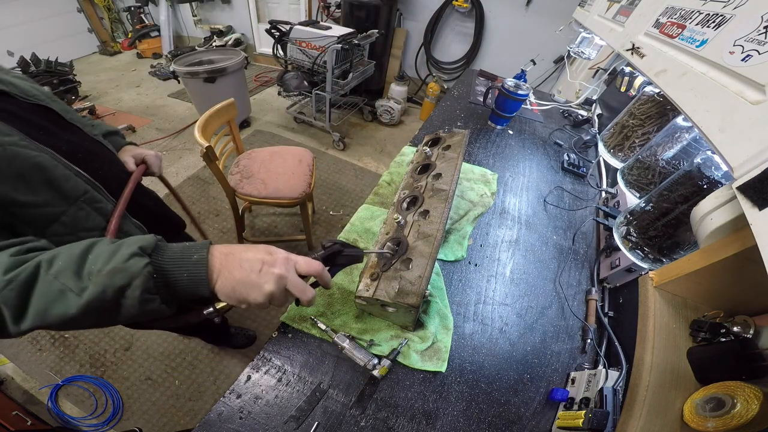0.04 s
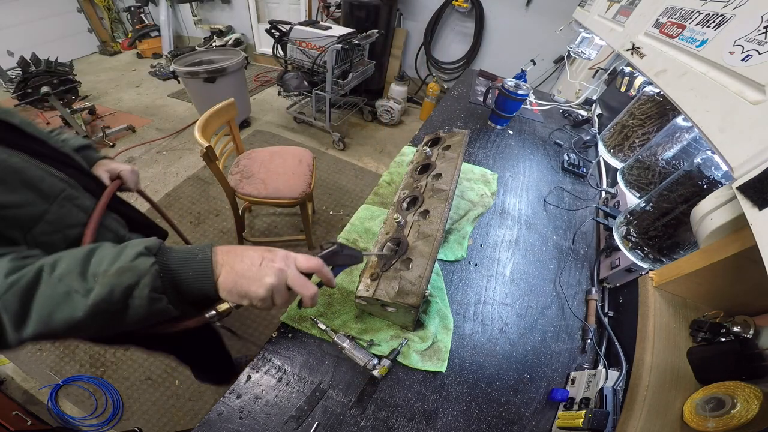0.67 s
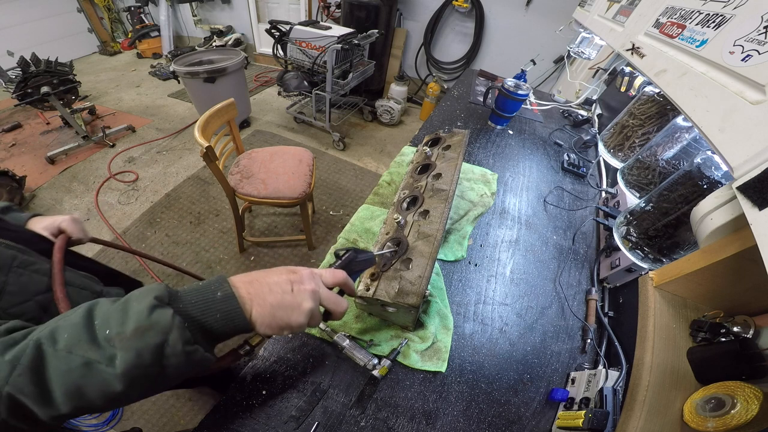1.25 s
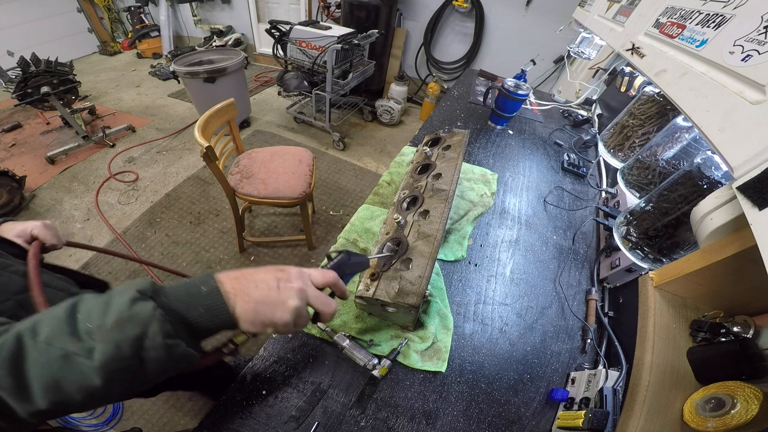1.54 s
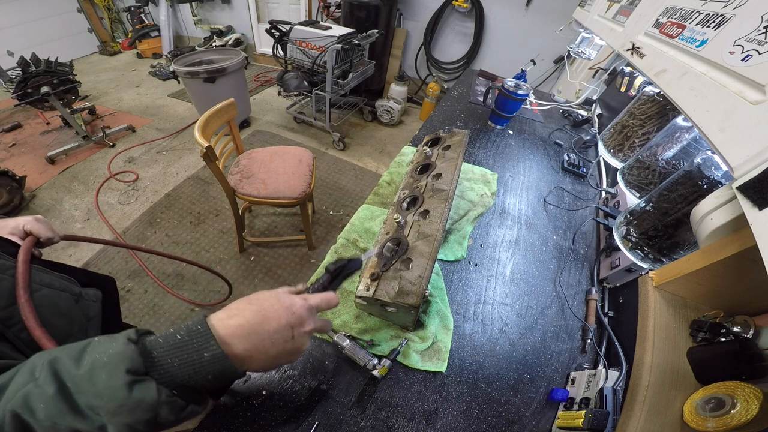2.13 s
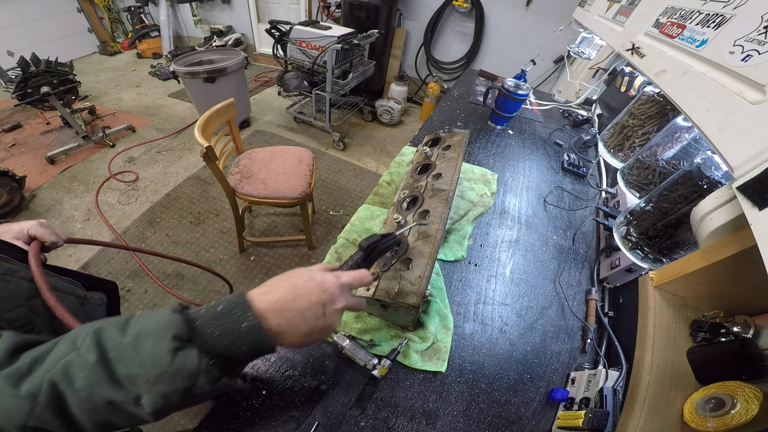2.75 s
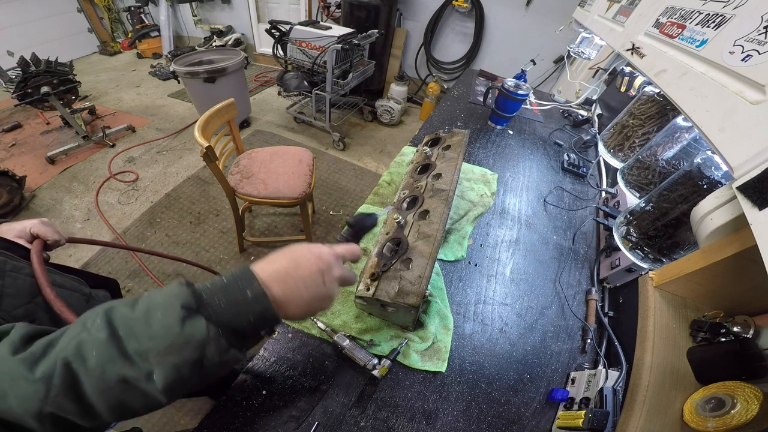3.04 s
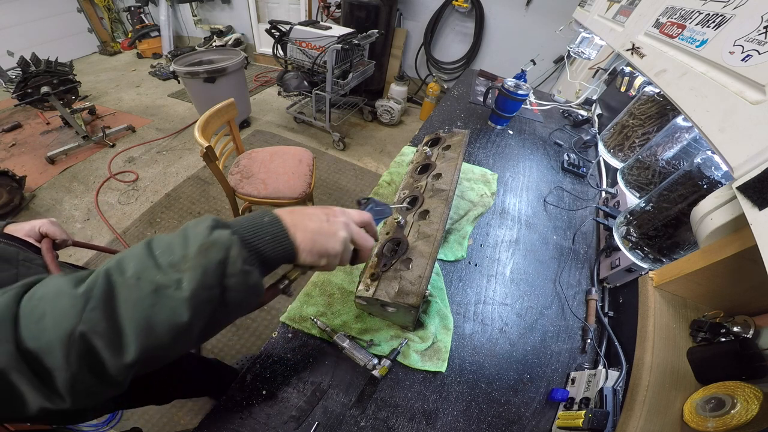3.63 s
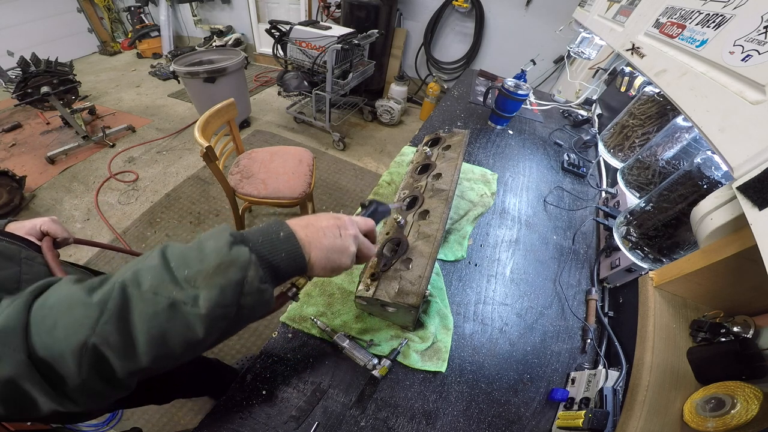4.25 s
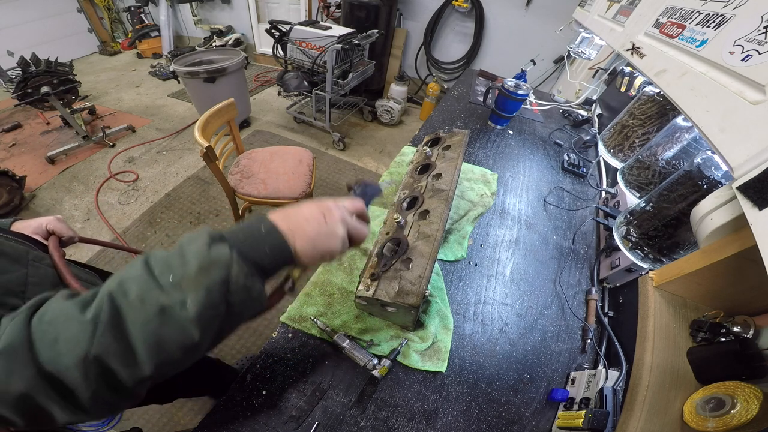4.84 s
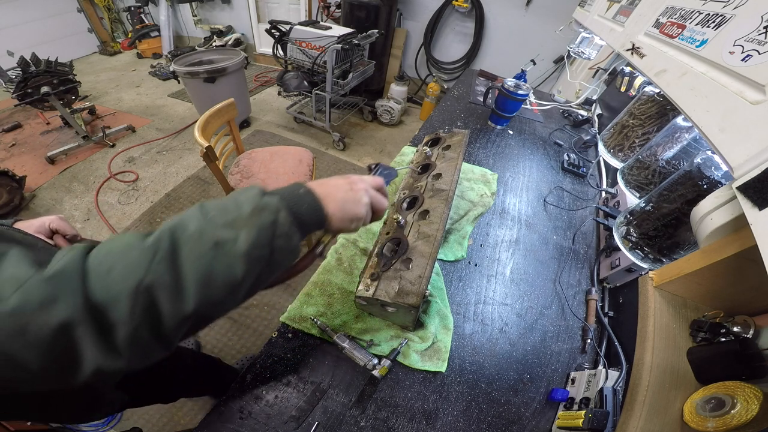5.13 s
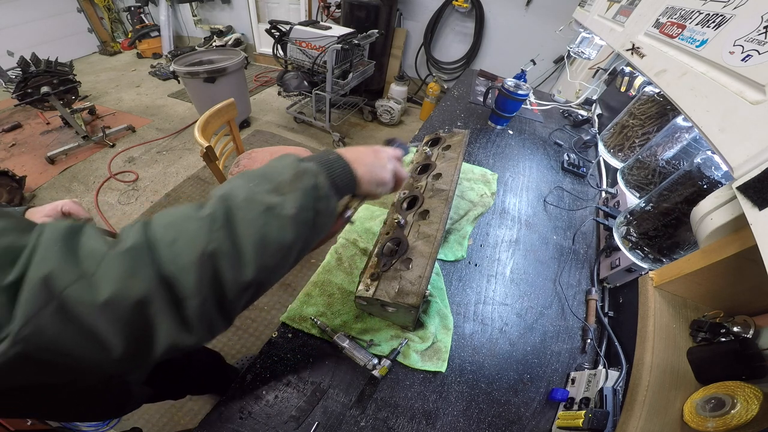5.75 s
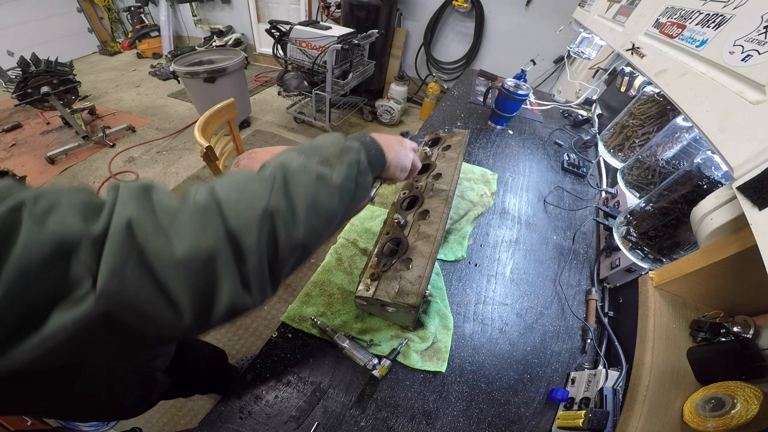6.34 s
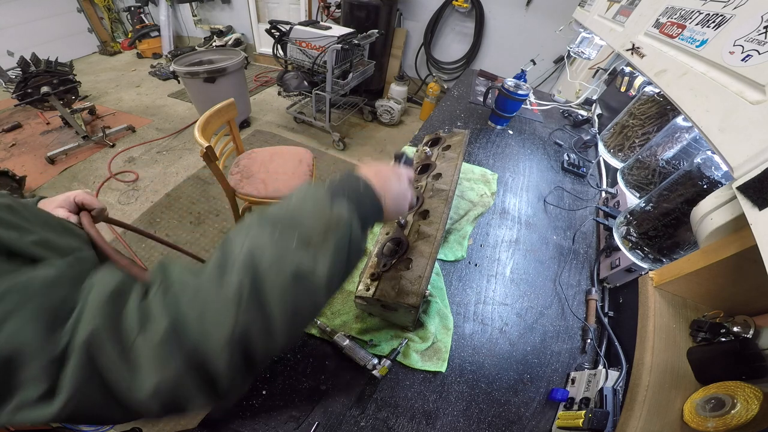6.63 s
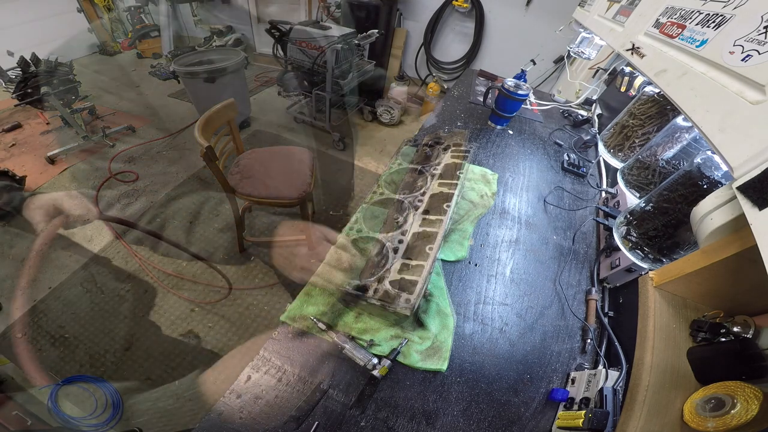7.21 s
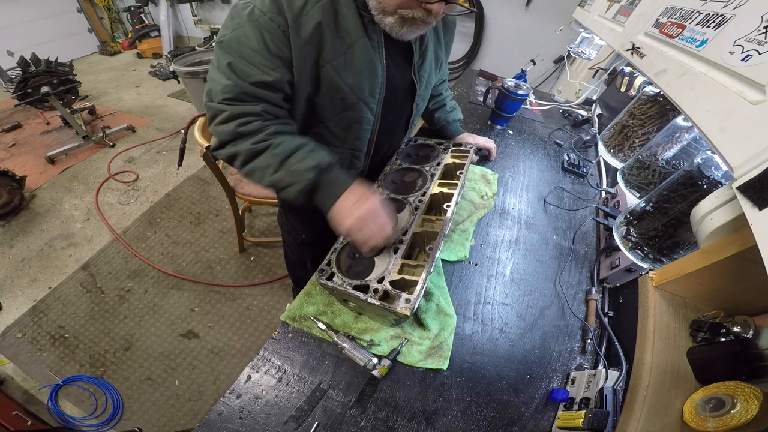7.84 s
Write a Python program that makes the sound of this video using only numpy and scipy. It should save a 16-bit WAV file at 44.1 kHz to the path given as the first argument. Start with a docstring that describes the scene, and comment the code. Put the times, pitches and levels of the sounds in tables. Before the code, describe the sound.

An air gun hisses and whistles over metal while a compressor chugs, then the sound turns into a high buzzing whine.

```python
"""Air gun and piston compressor

An air gun blows out a cylinder head on a workshop bench while a compressor chugs, its knocks repeating
each turn. The turbulent jet hisses, drives ports, holes and gaps into resonance and chirps across edges.
The whole sound dips six times, then crossfades to the compressor sped up into a high buzzing whine."""
import sys
import numpy as np
from scipy import signal
from scipy.fft import rfft, irfft, next_fast_len
from scipy.io import wavfile

SR = 44100
rng = np.random.default_rng(int(sys.argv[2]) if len(sys.argv) > 2 else 0)


def digitize_waveform(pressure):
    """Quantize a signal to 16-bit integers and store it at the path in sys.argv[1].

    Rows of a 2-D input are taken as channels; values are limited to [-1, 1].
    """
    field = np.atleast_2d(pressure).T
    bounded = np.clip(field, -1, 1)
    quanta = np.round(bounded * 32767).astype(np.int16)
    wavfile.write(sys.argv[1], SR, quanta)


N = 347493
TIME = np.arange(N) / SR
TURNS_PER_S, SPEED_UP = 18.36, 6.861


def from_db(db):
    """Amplitude ratio of a level in decibels."""
    return 10 ** (np.asarray(db) / 20)


def unit_rms(x):
    """Normalisation to an rms of 1."""
    return x / np.sqrt(np.mean(x ** 2) + 1e-20)


def in_time(curve):
    """Linear interpolation of (time, value) rows at every sample."""
    return np.interp(TIME, *np.transpose(curve))


def at_hz(spectrum, hz):
    """Interpolation of (frequency, level) rows on a logarithmic frequency axis."""
    row_hz, row_db = np.transpose(spectrum)
    return np.interp(np.log(hz + 1e-9), np.log(row_hz), row_db)


def bell(centre_s, length_s):
    """Gaussian pulse of height 1."""
    return np.exp(-np.minimum((2 * (TIME - centre_s) / length_s) ** 2, 50))


def drift(rate_hz):
    """Slow random fluctuation: low-pass noise of rms 1."""
    step, run_in = 40, 2000
    pole = np.exp(-2 * np.pi * rate_hz * step / SR)
    white = rng.standard_normal(N // step + run_in + 2)
    slow = signal.lfilter([1], [1, -2 * pole, pole ** 2], white)[run_in:]
    return np.interp(np.arange(N) / step, np.arange(len(slow)), unit_rms(slow))


def noise(spectrum):
    """Spectral shaping of white noise to a given density in dB per Hz."""
    size = next_fast_len(N)
    gain = from_db(at_hz(spectrum, np.fft.rfftfreq(size, 1 / SR))) * np.sqrt(SR / 2)
    return irfft(rfft(rng.standard_normal(size)) * gain, size)[:N]


def resonance(hz, width_hz, size=N):
    """A cavity driven by turbulence gives narrow-band noise about its natural frequency; rms 1."""
    core = signal.butter(1, width_hz / 2, fs=SR, output="sos")
    skirt = signal.butter(1, width_hz * 1.5, fs=SR, output="sos")
    in_phase, quadrature = signal.sosfilt(np.vstack([core, skirt]), rng.standard_normal((2, size)))
    phase = 2 * np.pi * np.cumsum(hz * np.ones(size)) / SR
    return unit_rms(in_phase * np.cos(phase) + quadrature * np.sin(phase))


# Strokes and valve slaps: (position in the cycle [turns], centre frequency [Hz], weight [dB])
PUMP_KNOCKS = [(.10, 200, 0), (.48, 230, 2), (.79, 600, 0), (.45, 1000, -3), (.69, 1000, 0),
               (.05, 1500, -3)]
def pump(strong, weak, speed, wobble_turns, count=95, size=8192):
    """Periodic knocks form a harmonic series on the rotation rate; the belt drive wobbles a little."""
    orders = np.arange(1, count + 1)
    normal_hz = orders * TURNS_PER_S
    # Standing waves in the room favour some harmonics.
    level_db = at_hz(weak, normal_hz * speed) + 2.8 * rng.standard_normal(count)
    for order, db in strong:
        level_db[order - 1] = db
    # The knocks set the phases, and reflections scatter them.
    phasors = rng.standard_normal(count) + 1j * rng.standard_normal(count)
    for position, hz, db in PUMP_KNOCKS:
        band = from_db(db) * np.exp(-2 * np.log(normal_hz / hz) ** 2)
        phasors += band * np.exp(-2j * np.pi * orders * position)
    harmonics = from_db(level_db) * phasors / abs(phasors)
    one_turn = irfft(np.r_[0, harmonics], size) * size / np.sqrt(2)
    turns = TURNS_PER_S * speed * TIME + wobble_turns * drift(2.04)
    return np.interp(turns % 1, np.arange(size) / size, one_turn)


# Motor partials at normal speed: (frequency [Hz], level [dB])
MOTOR_PARTIALS = [(59.4, -35.5), (118.8, -49.5), (238.4, -38)]
def motor(speed):
    """Superposed sinusoids: the electric motor hums at its own rate, unrelated to the pump's."""
    return sum(np.sqrt(2) * from_db(db) * np.sin(2 * np.pi * (hz * speed * TIME + rng.random()))
               for hz, db in MOTOR_PARTIALS)


# Strong pump harmonics: (harmonic number, level [dB])
PUMP_HARMONICS = [(2, -36), (6, -43), (7, -39.5), (9, -37.5), (10, -41.5), (12, -32), (15, -40),
                  (16, -35.5), (18, -38.5), (19, -49), (20, -38), (22, -42), (28, -45.5), (30, -39),
                  (31, -36), (34, -39.5), (38, -40), (39, -38.5), (49, -39), (50, -40), (51, -56),
                  (53, -36), (54, -43.5), (56, -59), (57, -41.5), (58, -39.5), (59, -42), (63, -42.5),
                  (70, -38.5), (72, -40)]
# Envelope of the weaker harmonics: (frequency [Hz], level [dB])
PUMP_ENVELOPE = [(18, -64), (55, -51.5), (150, -49.5), (450, -48), (800, -53), (1000, -72.5), (1300, -58.5),
                 (1500, -53), (1750, -64.5)]
# Intake and fan noise: (frequency [Hz], spectral density [dB per Hz])
INTAKE_SPECTRUM = [(15, -75), (40, -65), (90, -61.5), (170, -65), (320, -68.5), (420, -56), (500, -65),
                   (600, -61.5), (760, -64), (950, -59), (1250, -60.5), (1600, -71.5), (3000, -86)]
def compressor(gulp_depth=0.23):
    """Pump and motor sound over intake noise, amplitude-modulated by one gulp of air per turn."""
    chug = pump(PUMP_HARMONICS, PUMP_ENVELOPE, speed=1, wobble_turns=0.0018)
    gulps = 1 + gulp_depth * np.cos(2 * np.pi * (TURNS_PER_S * TIME - 2 / 3))
    return chug + motor(speed=1) + gulps * noise(INTAKE_SPECTRUM)


# Jet noise: (frequency [Hz], relative spectral density [dB])
HISS_SPECTRUM = [(500, -13), (1500, -9), (2200, -3), (3750, -2.5), (5000, -0.5), (6800, 0.5), (7500, 0),
                 (9300, 2.5), (11000, 1), (12700, 2), (14300, -0.5), (16000, 1)]
def jet_hiss(level_db, patchy_db=1.7, bands=22):
    """Turbulent noise brightens as it grows; its bands swell independently as the nozzle moves."""
    tilt_db_per_octave = -2.5 + 0.42 * (level_db + 23)
    size = next_fast_len(N)
    spectrum = rfft(unit_rms(noise(HISS_SPECTRUM)), size)
    hz = np.fft.rfftfreq(size, 1 / SR)
    edges_hz = np.linspace(0, 16000, bands + 1)
    hiss = np.zeros(N)
    for low, high in zip(edges_hz, edges_hz[1:]):
        band = irfft(spectrum * ((hz >= low) & (hz < high)), size)[:N]
        octaves = np.log2(max(high, 4000) / 10000)
        hiss += band * from_db(tilt_db_per_octave * octaves + patchy_db * drift(5.3))
    return from_db(level_db) * hiss


# Modes of the narrow gaps: (frequency [Hz], bandwidth [Hz], relative level [dB])
GAP_MODES = [(4483, 75, -3), (4826, 280, -4.5), (5470, 330, -4.5), (5740, 150, -7), (6660, 170, -7.5),
             (6890, 270, -8)]
# How squarely the jet meets the gaps: (time [s], relative level [dB])
GAP_COUPLING = [(0, 2), (.39, 1.5), (.45, -4), (2.17, -6), (2.88, -13.5), (3.24, -11), (3.65, -0.5),
                (3.84, -5), (5.04, -10.4), (5.37, -2.5), (5.74, -10.5), (6.85, -17), (7.31, -12)]
def gap_ringing(jet_db, usual_hz=5250, reach_hz=550, trim_db=-1.35):
    """Selective excitation: all gaps resonate, with a boost near the frequency the jet favours."""
    # Around each whistle, the favoured frequency is pulled towards its pitch.
    pulls = [(1.3 * bell(s - .02, 0.31), hz) for s, _, hz, _, _ in GAP_WHISTLES]
    favoured_hz = (usual_hz + sum(pull * hz for pull, hz in pulls)) / (1 + sum(p for p, _ in pulls))
    gains = [from_db(db) * (1 + 1 / (1 + ((hz - favoured_hz) / reach_hz) ** 2))
             for hz, _, db in GAP_MODES]
    ringing = sum(gain * resonance(hz, width) for gain, (hz, width, _) in zip(gains, GAP_MODES))
    return from_db(jet_db + in_time(GAP_COUPLING) + trim_db) * ringing / np.linalg.norm(gains, axis=0)


# Howl of a bolt hole: (time [s], level [dB])
HOLE_LEVEL = [(0, -38), (.39, -32), (1.06, -35.5), (2.06, -30), (2.6, -37), (3.05, -26), (3.23, -42),
              (3.6, -28), (3.73, -40), (4.05, -32.5), (4.78, -29), (5.0, -29), (5.3, -27), (5.81, -34.5),
              (6.07, -27.5), (6.6, -38), (7.3, -34)]
# Its resonance: (time [s], frequency [Hz])
HOLE_FREQUENCY = [(0, 2870), (4.5, 2800), (5.3, 2720), (6.3, 2770)]
def bolt_hole(swell_db, swell_share=0.48):
    """Cavity resonance of a bolt hole, sinking slightly as the nozzle moves along the casting."""
    level_db = in_time(HOLE_LEVEL) + swell_share * swell_db
    return from_db(level_db) * resonance(in_time(HOLE_FREQUENCY), width_hz=287)


# Howl of the big port: (time [s], level [dB])
PORT_LEVEL = [(0, -47), (.52, -26), (.85, -36), (1.1, -28.5), (2.15, -27.5), (2.3, -35.5), (4.6, -31),
              (5.22, -25), (5.7, -34), (7.3, -34.5)]
def big_port():
    """Cavity resonance of the port: a larger cavity has a lower natural frequency."""
    return from_db(in_time(PORT_LEVEL)) * resonance(955, width_hz=102)


def workshop(sound, t60_s=0.12, wet_db=-12.0):
    """Reverberation: dense reflections in the cluttered room decay exponentially."""
    age = TIME[:SR // 2]
    tail = rng.standard_normal(len(age)) * from_db(-60 * age / t60_s) * (age > .004)
    return sound + from_db(wet_db) * signal.fftconvolve(sound, tail / np.linalg.norm(tail))[:N]


def lock_in(events, sputter_db, release_s=0.087):
    """Lock-in: the jet snaps onto a cavity's frequency, sputters and lets go more slowly."""
    tones = np.zeros(N)
    for peak_s, length_s, hz, width_hz, db in events:
        near = np.flatnonzero(abs(TIME - peak_s) < 1 / 3)
        age = TIME[near] - peak_s
        rise = np.exp(-(age / (length_s * 0.47)) ** 2)
        fall = 1 / (1 + (2 * age / length_s) ** 2)
        tail = 0.24 * np.exp(-abs(age) / release_s)
        envelope = np.where(age < 0, rise, np.maximum(fall, tail))
        tones[near] += envelope * from_db(db) * resonance(hz, width_hz, size=len(near))
    return tones * from_db(sputter_db * drift(70))


# Whistles: (peak time [s], duration [s], frequency [Hz], bandwidth [Hz], level [dB])
GAP_WHISTLES = [(.23, .12, 5760, 120, -31), (.376, 0.049, 5550, 700, -23), (.568, .045, 5640, 700, -24),
                (0.799, .11, 5740, 250, -27), (1.31, .07, 5700, 500, -24), (1.809, .05, 4980, 700, -16.5),
                (3.66, .2, 4475, 60, -27), (3.69, .18, 5520, 220, -24.5), (4.57, .08, 4490, 60, -25.5),
                (5.589, 0.11, 5400, 500, -28.5), (6.71, .07, 4800, 500, -29)]
def gap_whistles():
    """Flow-excited resonance: the jet locks onto one narrow gap and whistles."""
    return lock_in(GAP_WHISTLES, sputter_db=0.5)


# Slow sway of the overall level: (time [s], gain [dB])
LEVEL_SWAY = [(0, 2), (1.0, -1.2), (2.41, -1.15), (2.8, 1), (3.53, 0.65), (3.78, -4.5), (4.4, -1),
              (5.92, -1.87), (6.44, 1.3), (7.2, -0.8)]
# Dips of the whole sound: (start [s], end [s], recovery time [s], overshoot [dB])
LEVEL_DIPS = [(0.982, 1.159, .04, 2), (1.548, 2.155, .035, 5), (2.938, 3.352, 0.036, 4.5),
              (3.773, 4.294, .008, 3), (4.595, 5.438, .03, 5), (6.775, 7.164, 0.028, -0.3)]
def sway_and_dips_db(dip_db=-15, fall_s=0.059, creep_db_per_s=13.5, settle_s=.2):
    """Slow amplitude modulation: in each dip the level drops, creeps up, snaps back and settles."""
    level_db = in_time(LEVEL_SWAY)
    for start, end, rise_s, overshoot_db in LEVEL_DIPS:
        fallen = np.clip((TIME - start) / fall_s, 0, 1)
        recovered = np.clip((TIME - end) / rise_s + 1, 0, 1)
        sunk_db = fallen * (dip_db + creep_db_per_s * (TIME - start))
        settling_db = overshoot_db * np.exp(-np.maximum(TIME - end, 0) / settle_s)
        level_db += (1 - recovered) * sunk_db + recovered * settling_db
    return level_db


# Chirps: (peak time [s], duration [s], frequency [Hz], bandwidth [Hz], level [dB])
EDGE_CHIRPS = [(2.248, 0.082, 2590, 380, -25.5), (2.382, 0.04, 3300, 380, -28),
               (2.556, 0.022, 3436, 400, -20), (2.71, .03, 3350, 350, -28), (2.9, .15, 3030, 450, -28),
               (2.98, 0.034, 3080, 480, -10), (4.881, 0.019, 3350, 340, -7.5), (4.93, 0.18, 3350, 400, -21),
               (5.689, 0.058, 2520, 300, -28), (6.66, .06, 2580, 320, -24), (6.789, 0.012, 4000, 2000, -18),
               (6.87, 0.079, 3200, 800, -24), (7.09, .06, 2525, 280, -25), (7.233, .018, 3520, 700, -16),
               (7.411, .028, 3450, 400, -17)]
def edge_chirps():
    """Edge excitation: the jet briefly sounds a hole as it crosses the edge."""
    return lock_in(EDGE_CHIRPS, sputter_db=1.5)


# Hiss as the jet nears and leaves the casting: (time [s], level [dB])
JET_LEVEL = [(0, -24.5), (.09, -31.5), (.28, -27), (1.11, -18.5), (1.17, -22.5), (2.06, -18.5), (2.14, -26),
             (2.45, -21.5), (2.71, -28.5), (3.02, -16.5), (3.32, -31), (3.61, -20.5), (4.52, -24.5),
             (4.96, -14), (5.51, -23), (6.05, -21), (6.42, -24.5), (7.3, -22.5)]
# Swells as the nozzle sweeps close over a rim: (peak time [s], duration [s], gain [dB])
RIM_SWELLS = [(.37, .12, 2.5), (0.56, 0.029, 1.5), (.817, .066, 3), (1.61, .15, 8.5), (1.816, .062, 7),
              (2.243, 0.079, 5), (2.562, 0.08, 3.5), (3.753, 0.13, 5), (3.968, 0.13, 8.9), (4.173, .132, 8),
              (4.373, .137, 4.2), (4.596, .141, 5.5), (5.148, 0.076, 2), (5.846, 0.098, 5),
              (6.007, 0.066, 1.5), (6.566, 0.084, 1.5), (6.787, .021, 12), (6.852, 0.049, 12)]
def air_gun(flutter_db=1.0):
    """Source and resonators: one fluttering jet hisses and excites the cavities of the casting."""
    swell_db = sum(db * bell(peak_s, length_s) for peak_s, length_s, db in RIM_SWELLS)
    jet_db = in_time(JET_LEVEL) + swell_db
    jet = jet_hiss(jet_db) + gap_ringing(jet_db) + bolt_hole(swell_db)
    port = big_port()
    jet += gap_whistles() + edge_chirps()
    flutter = from_db(flutter_db * drift(35))
    return workshop(jet * flutter) + port


# Strong harmonics of the sped-up pump: (harmonic number, level [dB])
FAST_HARMONICS = [(2, -44.5), (4, -43), (6, -46.5), (8, -49.5), (12, -44), (16, -39), (19, -47),
                  (20, -43.5), (22, -47), (24, -41.5), (26, -53), (29, -53), (30, -52), (31, -45),
                  (34, -46.5), (51, -46), (54, -44), (55, -44), (57, -46), (59, -47), (61, -47), (64, -59),
                  (69, -46), (70, -48), (73, -47)]
# Envelope of its weaker harmonics: (frequency [Hz], level [dB])
FAST_ENVELOPE = [(126, -75), (380, -66), (880, -48.5), (1130, -62), (1300, -50.5), (3000, -61), (5000, -55),
                 (6000, -57), (7000, -66), (9000, -50.5), (10000, -66), (12000, -71)]
# Its thin intake and fan noise: (frequency [Hz], spectral density [dB per Hz])
FAST_INTAKE_SPECTRUM = [(100, -91), (400, -83), (1500, -84), (2300, -81), (2900, -74), (3500, -75),
                        (4200, -79), (5200, -81), (6500, -79), (9000, -81), (10500, -88), (16000, -89)]
def fast_compressor(motor_db=-8.0):
    """Frequency scales with repetition rate: nearly seven times faster, the knocks fuse into a whine."""
    whine = pump(FAST_HARMONICS, FAST_ENVELOPE, SPEED_UP, wobble_turns=0.0022)
    return whine + from_db(motor_db) * motor(SPEED_UP) + noise(FAST_INTAKE_SPECTRUM)


# Fade-out of the sound at normal speed: (time [s], gain [dB])
NORMAL_FADE_OUT = [(7.194, -1), (7.293, -8.5), (7.405, -12.5), (7.52, -55)]
# Fade-in of the sped-up compressor: (time [s], gain [dB])
FAST_FADE_IN = [(0, -90), (6.85, -70), (6.95, -17), (7.1, -12), (7.25, -5), (7.45, -1.5), (7.88, 0.5)]
def scene():
    """Superposition: compressor and air gun crossfade to the whine, alike in both channels."""
    normal_db = sway_and_dips_db() + in_time(NORMAL_FADE_OUT)
    mono = from_db(normal_db) * (compressor() + air_gun())
    mono += from_db(in_time(FAST_FADE_IN)) * fast_compressor()
    return np.array([mono, mono])


def record(dry, ceiling=.8, cutoff_hz=15300):
    """Soft saturation rounds the highest peaks; a steep low-pass filter removes the top treble."""
    rounded = ceiling * np.tanh(dry / ceiling)
    return signal.sosfilt(signal.ellip(14, .1, 70, cutoff_hz, fs=SR, output="sos"), rounded)


dry = scene()
out = record(dry)
digitize_waveform(out)
```